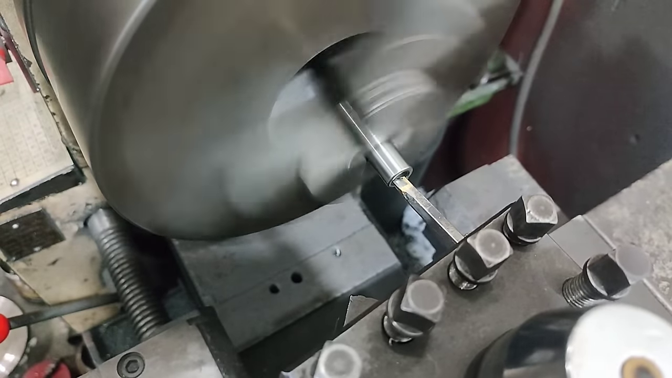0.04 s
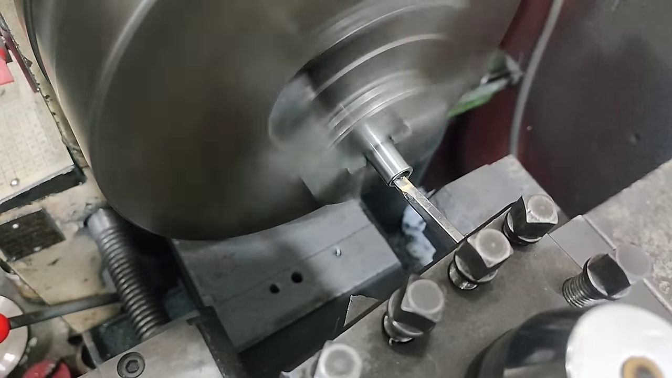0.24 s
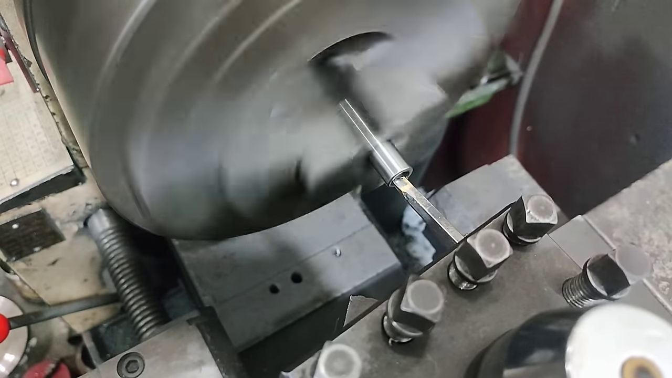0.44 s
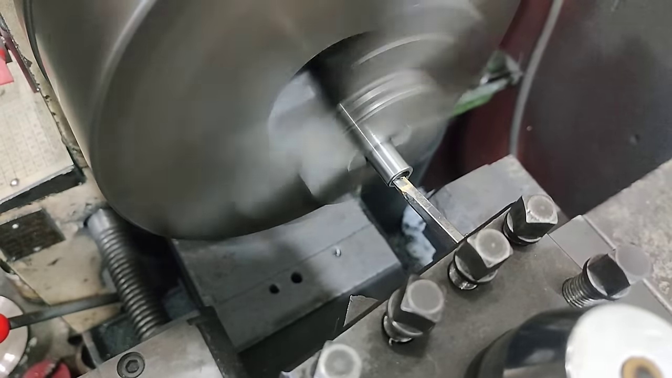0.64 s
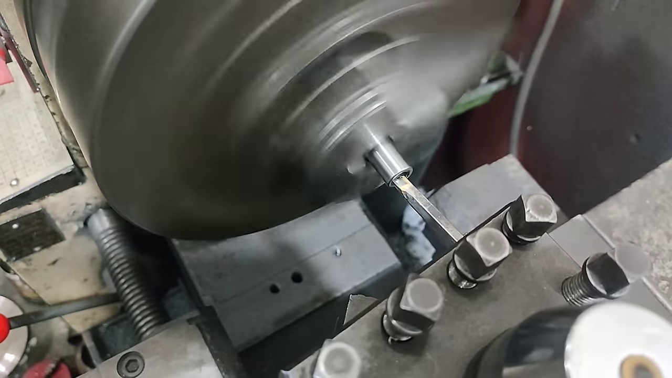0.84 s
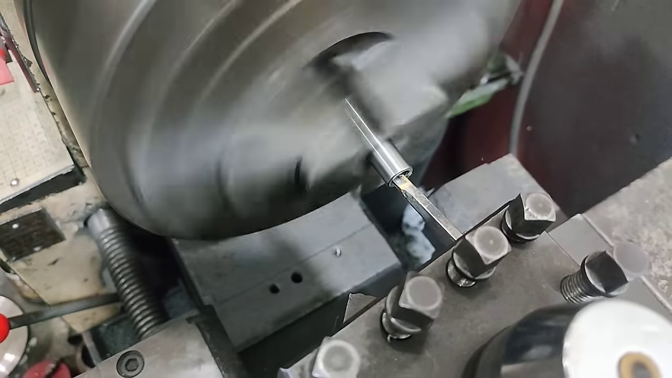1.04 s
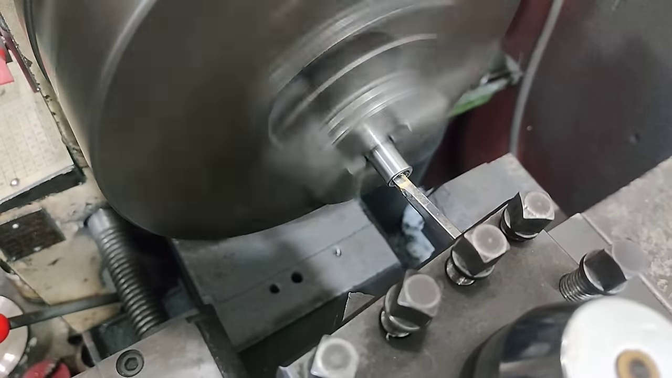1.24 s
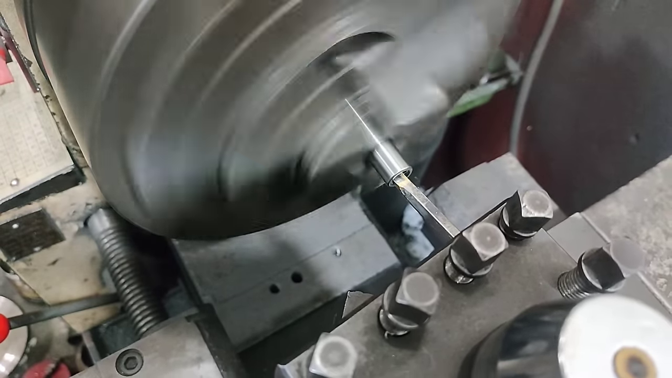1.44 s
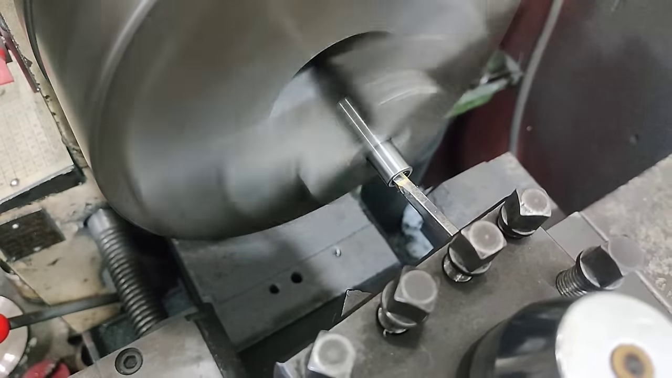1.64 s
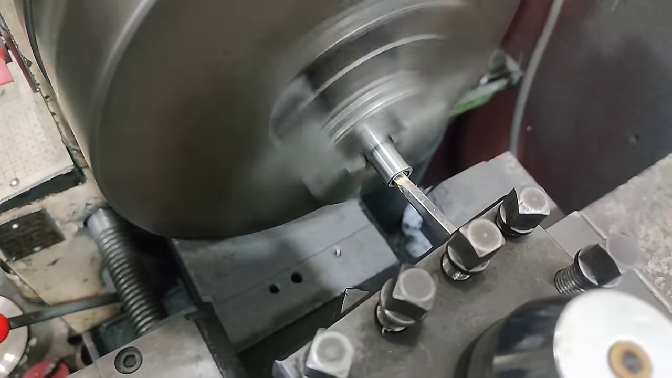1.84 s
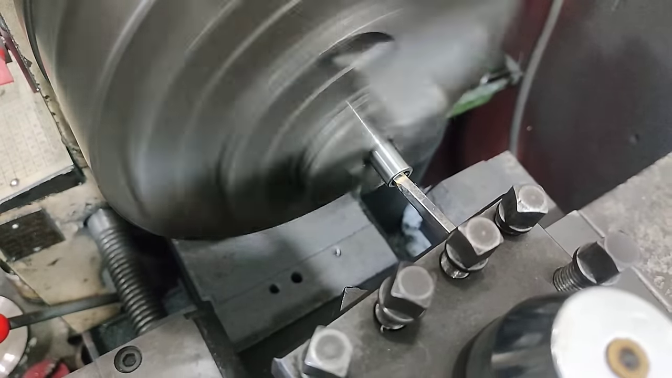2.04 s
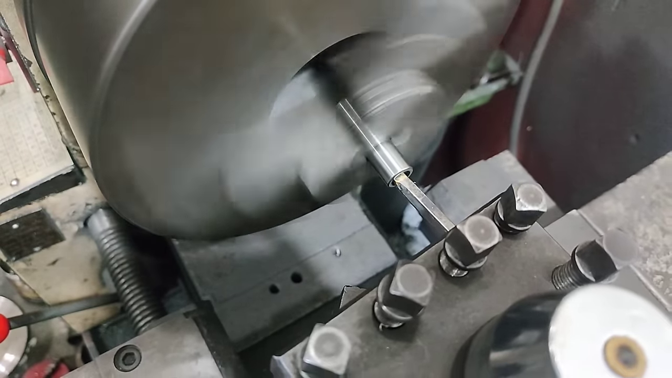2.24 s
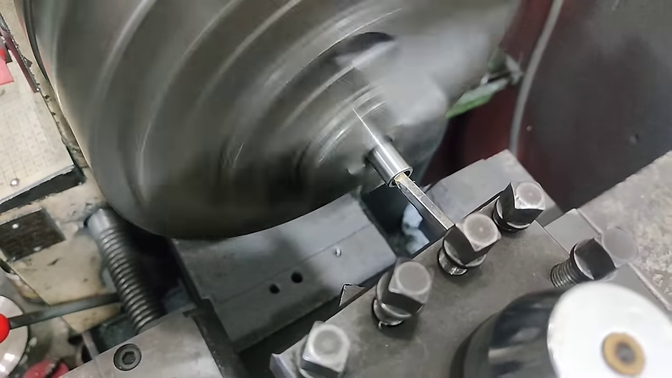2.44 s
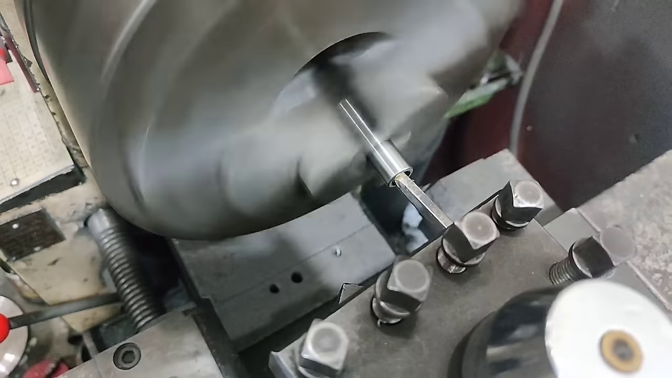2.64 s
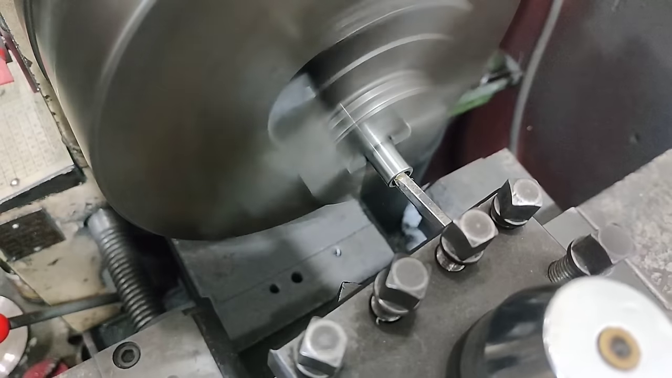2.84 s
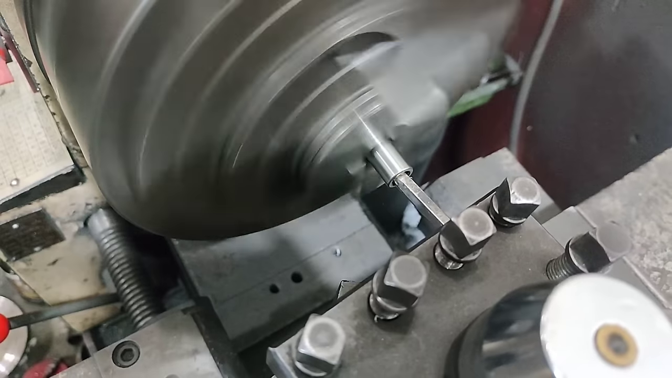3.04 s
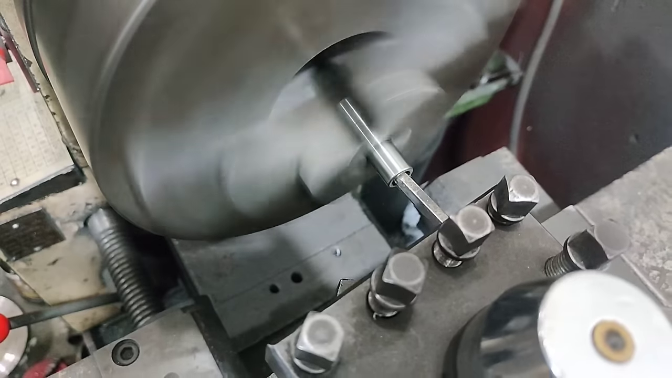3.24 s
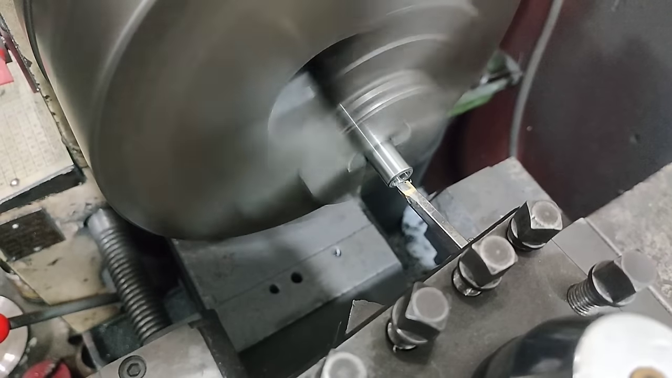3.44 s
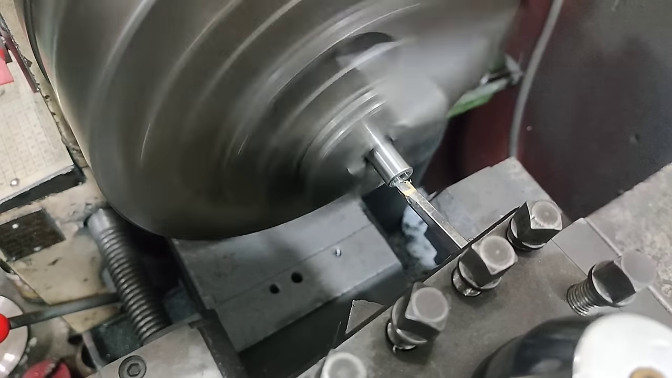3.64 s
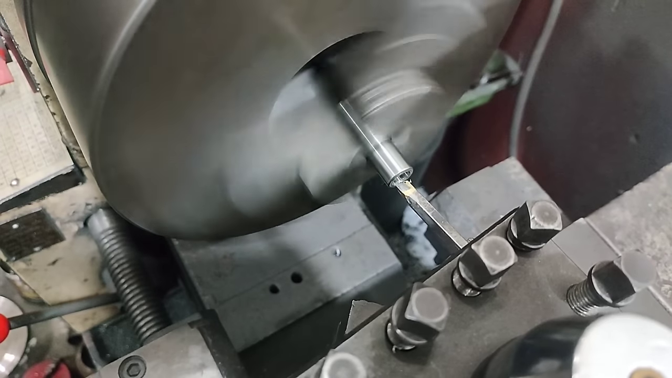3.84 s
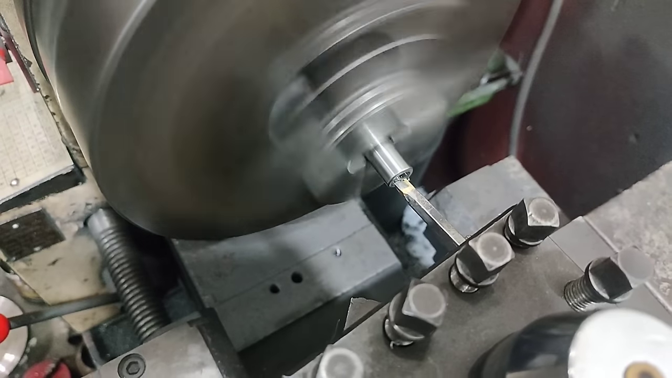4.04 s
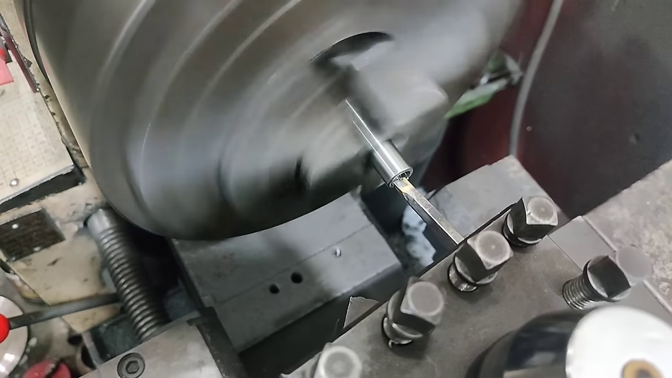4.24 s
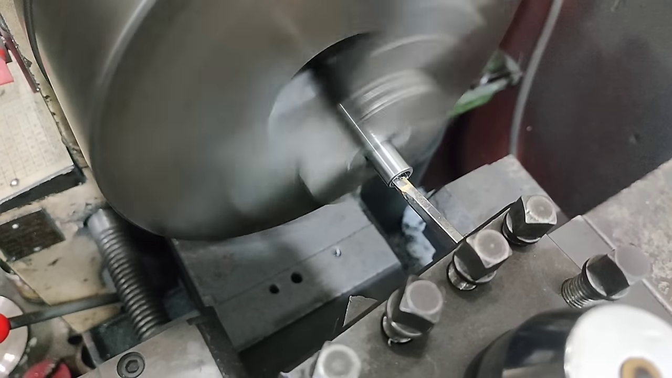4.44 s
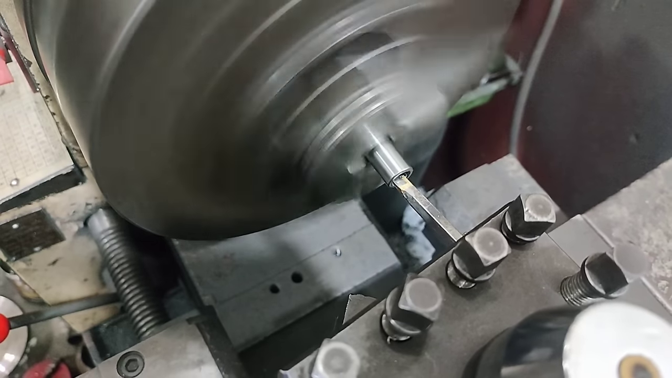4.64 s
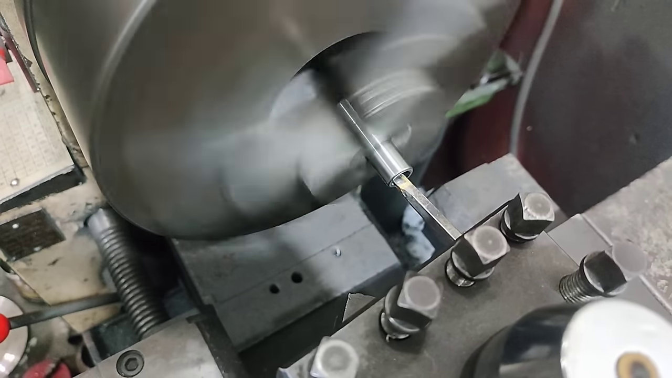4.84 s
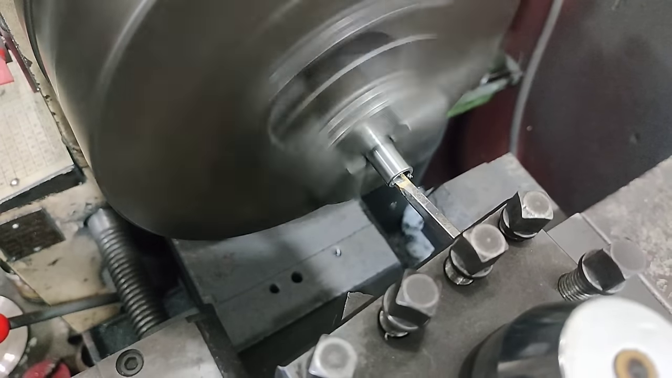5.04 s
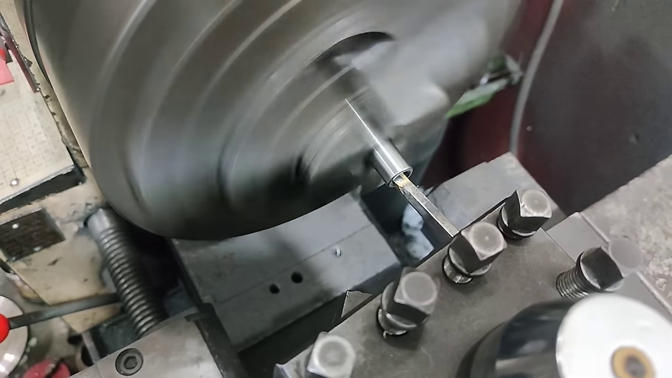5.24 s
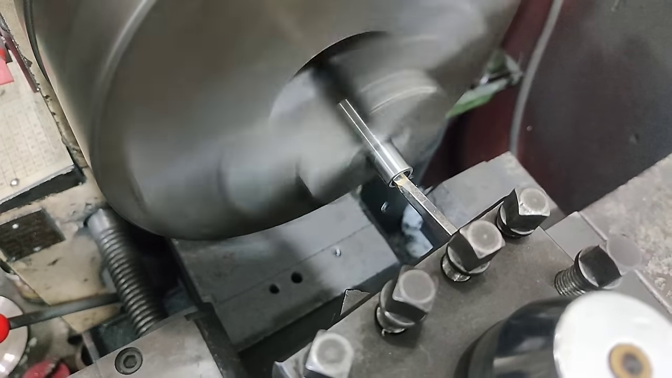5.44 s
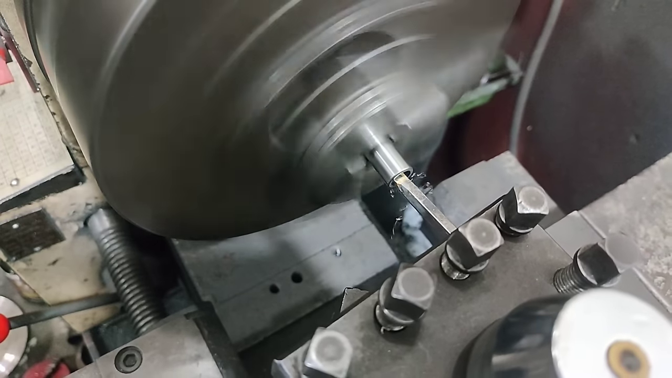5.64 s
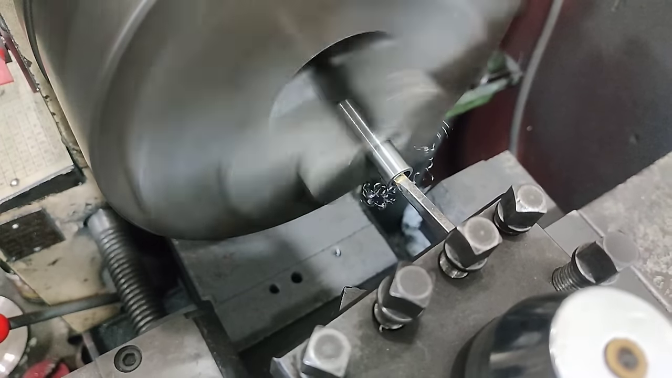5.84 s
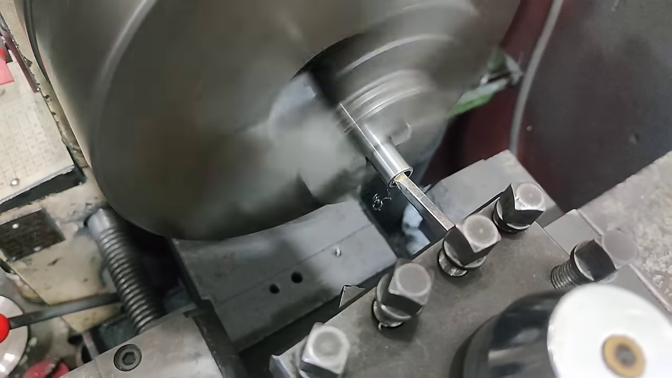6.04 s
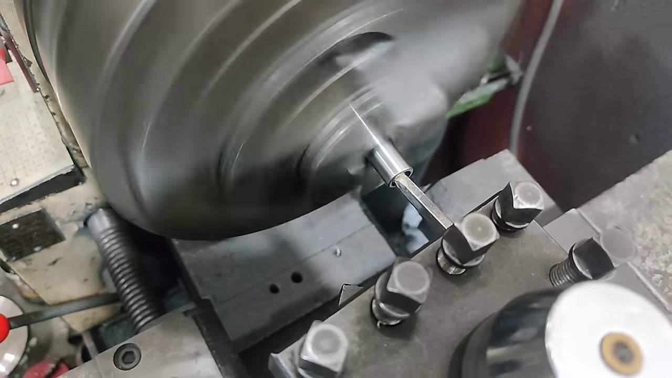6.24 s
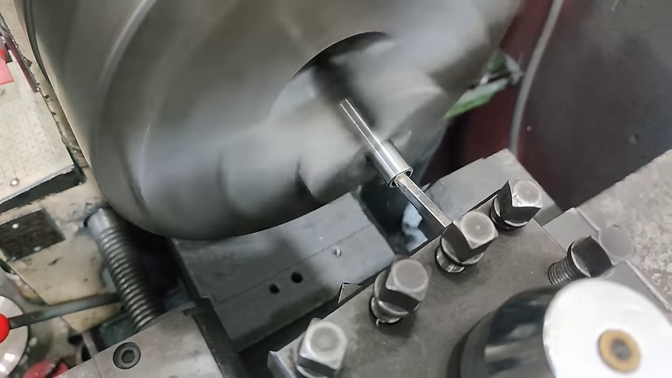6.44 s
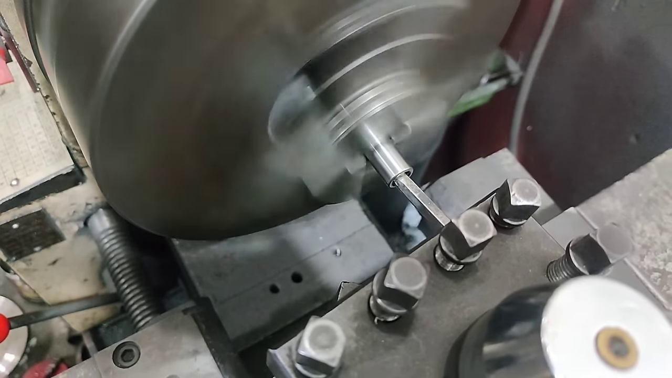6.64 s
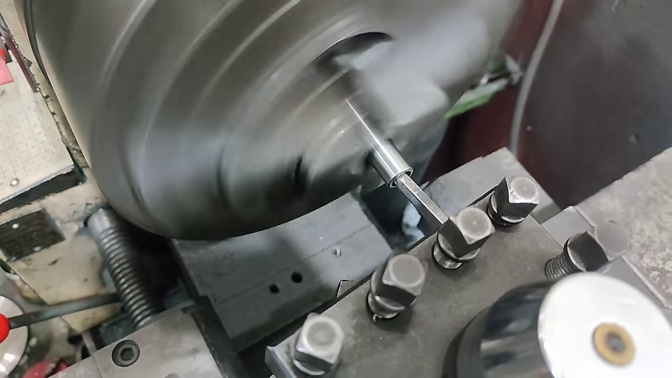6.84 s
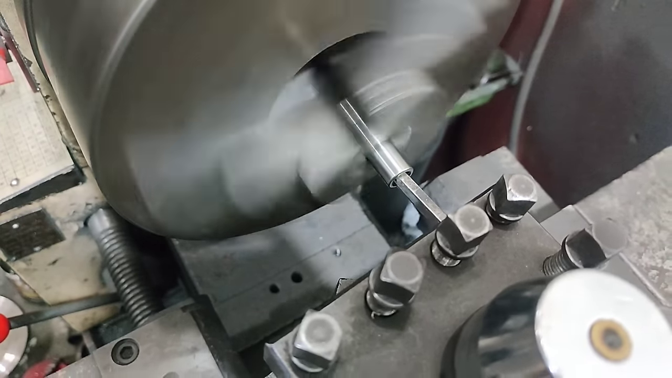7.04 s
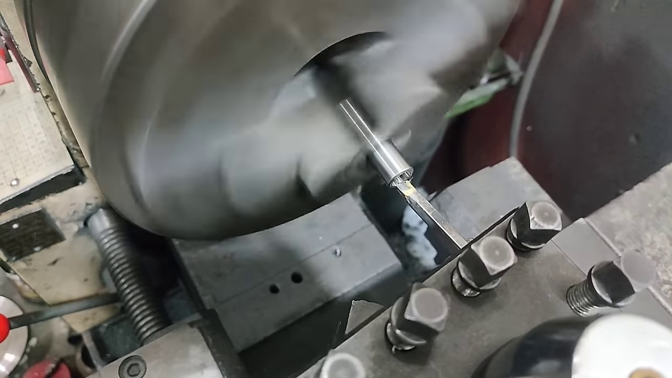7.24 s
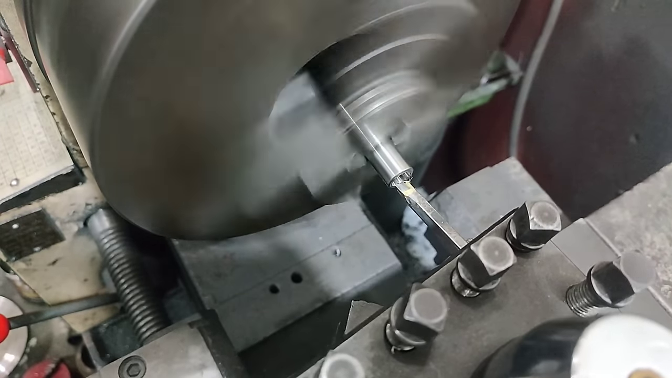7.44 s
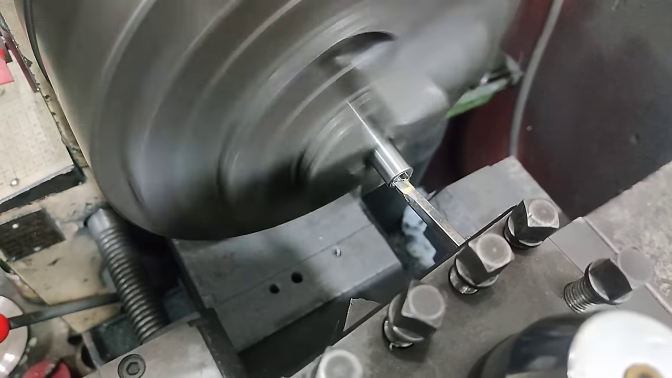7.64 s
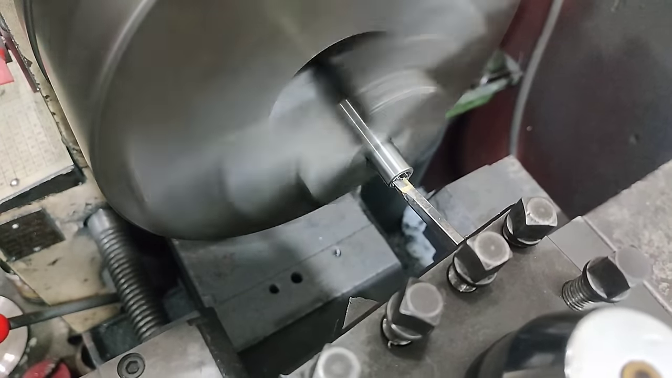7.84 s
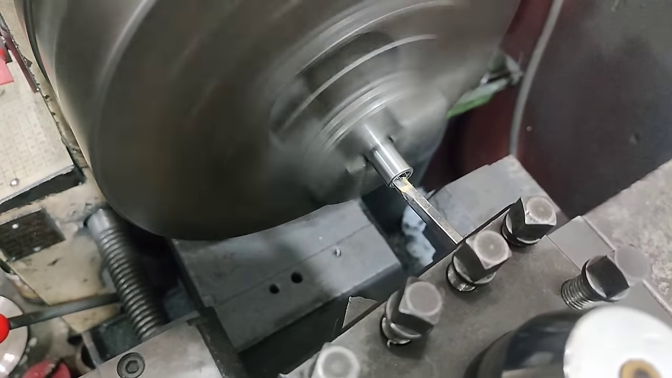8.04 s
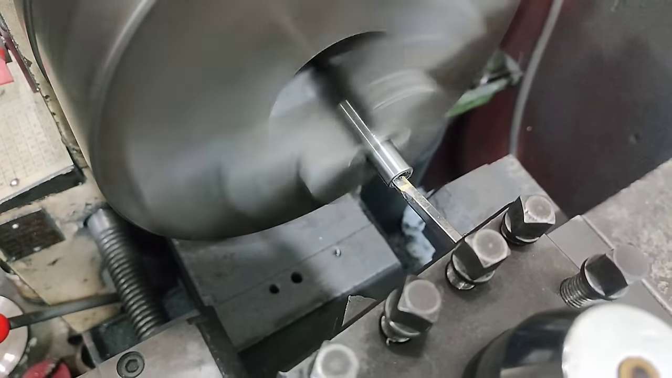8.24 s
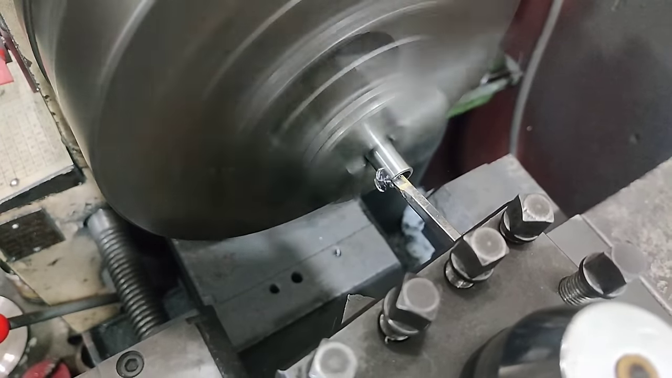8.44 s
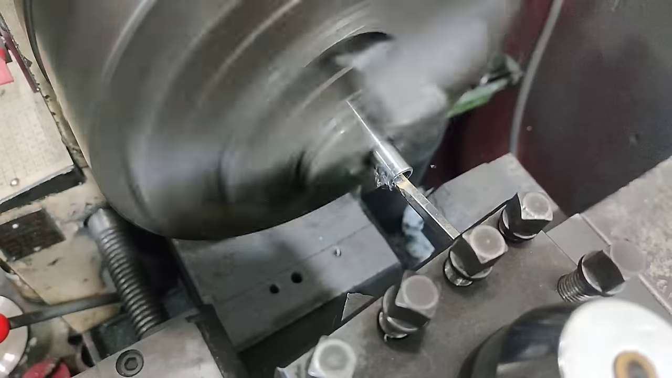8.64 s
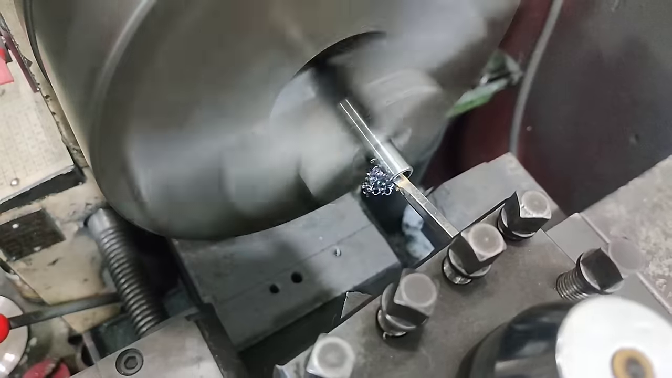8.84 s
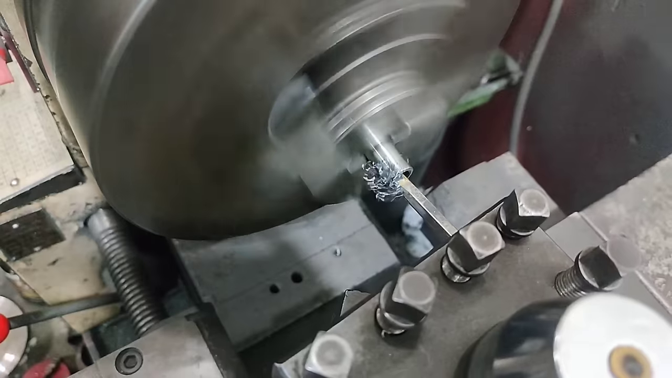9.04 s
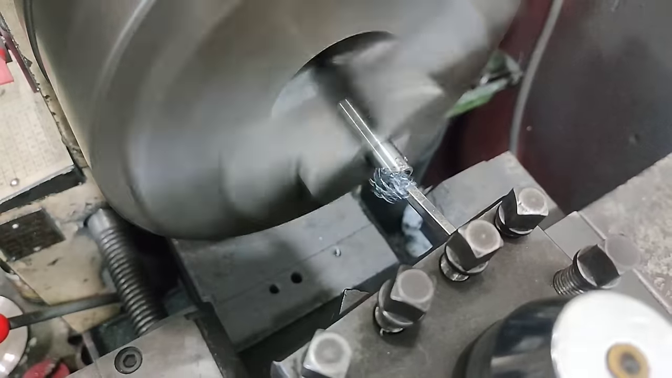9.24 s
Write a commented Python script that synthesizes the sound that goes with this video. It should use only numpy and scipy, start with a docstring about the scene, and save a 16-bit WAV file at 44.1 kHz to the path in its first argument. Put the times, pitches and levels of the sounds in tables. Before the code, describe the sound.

A lathe hums steadily in a workshop, heard closely in stereo: broad motor noise, whining gears, a steady tone near 1.1 kHz and low rumble stronger on the left. At about 0.9 s the boring tool bites with a piercing metallic squeal, dropping from 2.6 to 2.2 kHz, fluttering about 38 times a second, then climbing and turning ragged. Around 2.3 s it breaks into a wavering, flaring shriek near 14 kHz with scraping hiss; the machine sinks beneath it. A click at 3.3 s, and tool and echo vanish, leaving the hum. A second squeal starts at 4.5 s, falls, roughens near 6 s and breaks into shrieking and scraping from 6.2 s until a click and abrupt cut at 7.1 s, with a minute gap. The third begins at 8.1 s, sinking to 1.9 kHz, brighter and buzzier, over stronger rumble until the end, about 9.3 s.

```python
"""A chattering lathe

A lathe runs in a workshop: shaped noise and resonances make its motor and gears rumble and whine steadily.
Three times the boring tool bites and chatters, a harmonic series whose pitch wobbles on each turn of the work.
Twice the squeal breaks into a very high shriek, one wavering sine over a scraping hiss; a click is heard and
the sound of the tool is cut off at once, echo and all."""
import sys
import numpy as np
from scipy import signal
from scipy.fft import rfft, irfft
from scipy.io import wavfile
from scipy.ndimage import uniform_filter1d, minimum_filter1d

SR = 44100
rng = np.random.default_rng(int(sys.argv[2]) if len(sys.argv) > 2 else 0)


def attenuation_scalar(level_db):
    """Turn a level in dB into a linear amplitude multiplier (20 dB per decade)."""
    decades = np.asarray(level_db, float) / 20
    return 10 ** decades


def inscribe(sig):
    """Save sig as 16-bit PCM at rate SR to the path in sys.argv[1].

    A 1-D sig is mono; a 2-D sig holds one channel per row.
    Samples are clipped to [-1, 1] before scaling.
    """
    pcm = np.round(np.clip(np.atleast_2d(sig).T, -1, 1) * 32767)
    wavfile.write(sys.argv[1], SR, pcm.astype(np.int16))


N = 410130
SECONDS = np.arange(N) / SR
OPPOSITE = np.array([[1], [-1]])   # left up, right down

# Path of the chatter, one list per cut. Each row: time in seconds, pitch in Hz, relative level of the
# fundamental in dB.
SQUEALS = [
    [(0.86, 2590, -39), (0.885, 2490, -20), (0.954, 2242, -23), (1.242, 2167, -24), (1.51, 2215, -25.5),
     (1.68, 2304, -22), (1.95, 2420, -23), (1.998, 2560, -27), (2.068, 2394, -23.5), (2.265, 2570, -25),
     (2.285, 2804, -26.5), (2.42, 2875, -37.5)],
    [(4.507, 2640, -38), (4.544, 2480, -24), (4.75, 2294, -22), (4.9, 2198, -23), (5.6, 2155, -24),
     (5.944, 2212, -23), (6.096, 2473, -27.5), (6.2, 2510, -32), (6.215, 2900, -30), (6.3, 2880, -37.5)],
    [(8.09, 2540, -45), (8.125, 2457, -23.5), (8.2, 2318, -20), (8.25, 2257, -23), (8.456, 2132, -23),
     (8.952, 1902, -24), (9.3, 1900, -25.5)],
]
# Timbre against pitch: the upper harmonics strengthen as the chatter falls. Each row: pitch in Hz, octave in dB
# and upper harmonics in dB, both relative to the fundamental, swing per turn in Hz.
CHATTER = [(1900, -0.5, 1.5, 39.5), (2050, 0, -0.5, 85), (2205, 2, -2, 77.6), (2333, 2.5, -8, 60),
           (2434, 3, -8.5, 54.3), (2607, -7.5, -11.5, 50), (2900, -6, -12, 50.4)]
# Slope of the harmonic series. Each entry: relative level in dB, from the third harmonic to the seventh.
UPPER_DB = [-2.5, -4.5, -8.5, -9.5, -12]
# How well tool and work radiate the upper harmonics. Each row: frequency in Hz, gain in dB.
RADIATION = [(5500, 0.5), (7000, -2), (8800, 1), (9600, 0), (10300, -7), (11300, 2), (12500, 4),
             (14000, -7)]
# Balance of the harmonics. Each row: frequency in Hz, left minus right in dB.
SQUEAL_SIDE = [(1500, 14), (2200, -1), (4400, -6), (6500, -3.5), (8800, 7.5), (13000, -3)]
CATCH_S, BEFORE_CATCH_DB = 0.034, -15   # the overtones catch suddenly, a little after the fundamental
JITTER_HZ, RAGGED_JITTER_HZ = 18, 260
SCRATCH_FLICKER_DB = 3


def squeal(turn, ragged):
    """Stick-slip oscillation: phase-locked harmonics swing as the depth of cut changes round each turn."""
    on, (hz, low_db) = in_time(SQUEALS)
    catching = sum(span(rows[0][0] - CATCH_S, 2 * CATCH_S, .004) for rows in SQUEALS)
    over_db = low_db + BEFORE_CATCH_DB * catching
    octave_db = over_db + at_hz(CHATTER, hz)
    upper_db = over_db + at_hz(CHATTER, hz, axis=2)

    wobble = np.sin(turn) + .3 * np.cos(2 * turn) + .12 * drift(8)
    swing = at_hz(CHATTER, hz, axis=3) * wobble
    jitter = (JITTER_HZ + RAGGED_JITTER_HZ * ragged) * drift(80)
    phase = 2 * np.pi * np.cumsum(hz + swing + jitter) / SR

    levels_db = [low_db, octave_db]
    for k, db in enumerate(UPPER_DB, 3):
        levels_db.append(upper_db + db + at_hz(RADIATION, k * hz))
    harmonics = 0
    for k, db in enumerate(levels_db, 1):
        pan_db = at_hz(SQUEAL_SIDE, k * hz) / 2 * OPPOSITE
        throb_db = 1.5 * min(k, 3) * np.sin(turn + 1.0 * k) + 1.7 * drift(37)
        rasp = 1 + (0.07 + 0.04 * k) * drift(300)   # noisy skirts, stronger on the higher harmonics
        level = attenuation_scalar(db + 6.0 + pan_db + throb_db - 2.7 * ragged)
        harmonics = harmonics + level * rasp * np.sin(k * phase)

    chips = attenuation_scalar(upper_db - 6.5) * stereo_noise(resonance(12700, 2200))   # bright hiss of the chip on the tool
    chips += attenuation_scalar(upper_db - 11) * stereo_noise(resonance(13500, 500))   # it also stirs the tool's high mode
    scratch = stereo_noise(resonance(3100, 1600)) + 1.8 * stereo_noise(resonance(6700, 9000))
    scratch_level = ragged * attenuation_scalar(low_db - 1.5 + SCRATCH_FLICKER_DB * drift(40))
    return on * (harmonics + chips + scratch_level * scratch)


# Path of the high mode, one list per shriek. Each row: time in seconds, pitch in Hz, relative tone level in dB.
SHRIEKS = [
    [(2.25, 13900, -45), (2.3, 14030, -26), (2.444, 14160, -27), (2.528, 14080, -23), (2.656, 14080, -29),
     (2.82, 14100, -19), (2.9, 13700, -13), (2.952, 13790, -9), (3.06, 13690, -10.5), (3.198, 13700, -13.5),
     (3.335, 13900, -15.5)],
    [(6.17, 13960, -29), (6.246, 14060, -13), (6.364, 14100, -9.5), (6.41, 14000, -11),
     (6.462, 13980, -13.5), (6.7, 14080, -19.5), (6.906, 13540, -15.5), (6.99, 14140, -19),
     (7.092, 13770, -17), (7.112, 13900, -28)],
]
# The shriek is noisier and less steady when it sags in pitch. Each row: pitch in Hz, noise skirt in dB relative
# to the tone, waver in Hz.
SKIRT = [(13700, -17.5, 75), (13900, -15, 70), (14080, -31, 43)]
# The shriek flares up. Each row: time in seconds, relative peak in dB.
FLARES = [(2.3752, -7), (2.3996, -11), (2.4345, -8), (2.4819, -12.5), (2.5069, -12), (2.5368, -13),
          (2.5597, -16), (2.7877, -11), (2.8506, -6), (2.8815, -7), (2.92, -7), (3.0032, -2), (3.0697, -6),
          (3.1095, -7), (3.322, -7), (6.2214, -10), (6.8704, -1.5), (6.967, -3)]
# Spells of hard scraping. Each row: start in seconds, length in seconds, relative starting level in dB.
SCRAPES = [(2.478, 0.011, -39), (2.529, 0.28, -39), (6.415, .4, -38), (6.995, 0.14, -36.5)]
# Spectrum of the scraping hiss. Each row: frequency in Hz, relative density in dB per Hz.
SCRAPE = [(1470, -51), (2500, -14.5), (4660, -36), (5500, -11), (6060, -14), (7830, -2), (9230, -25.5),
          (12000, -9), (15600, -36), (22000, -120)]
# Lower mode of the tool: centre in Hz, width in Hz.
LOWER_RING = (12480, 290)
SCRAPE_FADE_DB_PER_S = -17.5
LIGHT_SCRAPE_DB, RING_DB, FLARE_LIFT_DB = -49, 10, 4.0   # all relative


def shriek(turn, ragged):
    """Modal vibration: a high mode of the tool sings, wavers and flares; a lower one rings under scraping."""
    on, (hz, tone_db) = in_time(SHRIEKS)
    waver = at_hz(SKIRT, hz, axis=2) * (.85 * np.sin(turn) + drift(70))
    phase = 2 * np.pi * np.cumsum(hz + waver) / SR
    kicks = np.zeros(N)
    for s, db in FLARES:
        kicks[round((s - .003) * SR)] = attenuation_scalar(db + FLARE_LIFT_DB)
    flares = signal.fftconvolve(kicks, np.hanning(int(0.013 * SR)))[:N]
    tone_level = np.maximum(attenuation_scalar(tone_db + 3.0 + 1.7 * drift(30)), flares)
    tone = tone_level * np.sin(phase)

    throb = attenuation_scalar(3.8 * np.sin(turn) + 3.9 * drift(49)) * (1 - ragged)
    hard = 0
    for s, length_s, db in SCRAPES:
        hard = hard + span(s, length_s, 0.0058) * attenuation_scalar(db + SCRAPE_FADE_DB_PER_S * (SECONDS - s))
    skirt_noise = stereo_noise(lambda f: resonance(13200, 2200)(f) ** 2)
    skirt = attenuation_scalar(tone_db + at_hz(SKIRT, hz)) * skirt_noise
    ring = hard * attenuation_scalar(RING_DB) * stereo_noise(resonance(*LOWER_RING))
    hiss = stereo_noise(lambda f: attenuation_scalar(at_hz(SCRAPE, f)))
    scrape = (hard + attenuation_scalar(LIGHT_SCRAPE_DB)) * attenuation_scalar(4.5) * hiss
    return on * (tone + throb * (skirt + ring + scrape))


# Short clicks. Each row: start in seconds, level in dB.
CLICKS = [(3.326, -26.5), (7.098, -26)]


def clicks():
    """Short noise bursts: a click of bright broadband noise is heard just before the tool sound is cut off."""
    bursts = sum(attenuation_scalar(db) * span(s, 0.0029, .001) for s, db in CLICKS)
    return bursts * stereo_noise(resonance(10700, 12000))


# The tool loses its grip. Each row: start in seconds, worst moment in seconds, end in seconds, raggedness 0 to 1.
BREAKUPS = [(2.231, 2.35, 2.45, .55), (6.019, 6.205, 6.3, .85)]


def loss_of_grip():
    """Breakdown of the stick-slip cycle: raggedness rises straight to its worst and falls straight back."""
    ragged = sum(np.interp(SECONDS, row[:3], [0, row[3], 0]) for row in BREAKUPS)
    return np.clip(ragged, 0, 1)


def rotation():
    """Periodic forcing: the angle of the work in radians, at a slightly drifting 38 turns per second."""
    return 2 * np.pi * np.cumsum(38 + 1.8 * drift(1.5)) / SR


# Spectrum of motor and bearing noise. Each row: frequency in Hz, relative density in dB per Hz.
DRIVE = [(41, -49), (70, -14), (389, -11), (444, -8.5), (580, -12.5), (678, -4.5), (775, -7), (1080, -5),
         (1210, -12), (1380, -11.5), (2880, -17), (7010, -26.5), (14300, -50.5)]
# Gear resonances. Each row: centre in Hz, width in Hz, level in dB relative to the drive noise.
GEARS = [(449, 23, -15.5), (688.6, 26, -7.5), (1100, 72, -7), (1355, 55, -11.5), (2022, 180, -11.5),
         (12800, 2600, -33)]
# Steady motor tone: frequency in Hz, level in dB relative to the drive noise.
MOTOR_WHINE = (1100, -2.74)
# The rumble grows for good: middle of the rise in seconds, length of the rise in seconds, gain in dB.
RUMBLE_SWELL = (8.2, .3, 4.2)
DRIVE_DB, DRIVE_LEFT_DB = -27.5, 0.87   # level; left minus right
RUMBLE_DB, RUMBLE_WAVER_DB = -47, 2.5


def machine(sink_db):
    """Broadband and resonant radiation: motor noise, gear whines, a motor tone, a rumble stronger on the left."""
    drive = stereo_noise(lambda hz: attenuation_scalar(at_hz(DRIVE, hz))) * attenuation_scalar(0.93 * drift(14.0))
    for hz, width_hz, db in GEARS:
        drive += attenuation_scalar(db) * stereo_noise(resonance(hz, width_hz))
    hz, db = MOTOR_WHINE
    phase = 2 * np.pi * np.cumsum(hz + 2.91 * drift(12.35)) / SR
    whine_level = attenuation_scalar(db + 1.5 * np.array([drift(35), drift(18)]))
    drive += whine_level * np.sin(phase + [[1.3], [0]])   # left leads

    s, rise_s, swell_db = RUMBLE_SWELL
    rumble_db = RUMBLE_DB + RUMBLE_WAVER_DB * drift(3.7)
    rumble_db = rumble_db + swell_db * span(s, N / SR, rise_s) + 0.35 * sink_db
    rumble = stereo_noise(resonance(48.6, 53)) * attenuation_scalar(np.array([[5.0], [-1.5]]))
    return attenuation_scalar(DRIVE_DB + sink_db + DRIVE_LEFT_DB / 2 * OPPOSITE) * drive + attenuation_scalar(rumble_db) * rumble


# The machine sinks while the tool shrieks, and slightly once near the end; overlapping rows add.
# Each row: start in seconds, length in seconds, change in dB.
SINKS = [(2.357, .975, -3.5), (2.452, 0.37, -5.5), (6.05, 1.086, -5.5), (6.043, 0.21, -3),
         (6.42, 0.395, -4), (6.98, 0.12, -4), (9.0, 0.39, -1.5)]


def sinking():
    """Level modulation: the sagging of the machine, in dB."""
    return sum(db * span(s, length_s, .02) for s, length_s, db in SINKS)


def shop(x, t60_s, wet_db):
    """Reverberation: direct sound plus a dense exponentially dying tail of its own in each channel."""
    t = np.arange(int(t60_s * SR)) / SR
    tail = rng.standard_normal((2, len(t))) * attenuation_scalar(-60 * t / t60_s) * (t > .001)
    tail *= attenuation_scalar(wet_db) / np.sqrt(np.sum(tail ** 2, axis=1, keepdims=True))
    tail[0, 0] = tail[1, 12] = 1   # direct sound, 12 samples later on the right: the tool is nearer the left
    return signal.fftconvolve(x, tail, axes=1)[:, :N] / np.hypot(1, attenuation_scalar(wet_db))


# Coherence between the channels. Each row: frequency in Hz, left-right likeness, lead of the left in radians.
LIKENESS = [(60, 0.29, 0.1), (130, 0.8, 0.1), (298, 1, 0.33), (440, 0.71, 0.47), (677, 0.73, 1.91),
            (1500, 0.073, 1.91), (4000, 0.082, 2.55)]


def stereo_noise(gain_at):
    """Partial coherence: noise of rms 1 with amplitude gain_at(Hz), shared and opposed parts mixed by likeness."""
    hz = np.arange(N // 2 + 1) * SR / N + 1
    mid, side = rfft(rng.standard_normal((2, N))) * gain_at(hz)
    alike = np.clip(at_hz(LIKENESS, hz), -1, 1)
    pair = np.sqrt(1 + alike) * mid + np.sqrt(1 - alike) * side * OPPOSITE
    pair[0] *= np.exp(1j * at_hz(LIKENESS, hz, axis=2))
    return rms_one(irfft(pair, N))


def resonance(centre_hz, width_hz):
    """Resonance curve: amplitude 1 on top, one half at the edges of the width."""
    return lambda hz: 1 / (1 + (2 * (hz - centre_hz) / width_hz) ** 2)


def drift(rate_hz):
    """Low-passed noise of rms 1: sparse noise, every 40 samples, through a double one-pole filter."""
    r = np.exp(-80 * np.pi * rate_hz / SR)
    sparse = rng.standard_normal(N // 40 + 2002)
    slow = signal.lfilter([1], [1, -2 * r, r * r], sparse)[2000:]   # past the filter's build-up
    return np.interp(np.arange(N) / 40, np.arange(len(slow)), rms_one(slow))


def rms_one(x):
    """Normalisation by mean power: scale to rms 1."""
    return x / np.sqrt(np.mean(x ** 2) + 1e-20)


def span(start_s, length_s, edge_s):
    """Gating: 1 during a span, 0 outside, with straight edges."""
    inside_s = np.minimum(SECONDS - start_s, start_s + length_s - SECONDS)
    return np.clip(inside_s / max(edge_s, 1e-4) + .5, 0, 1)


def in_time(tables):
    """Linear interpolation in time: a softened mask of where any table runs, and the columns at every sample."""
    s, *columns = np.transpose(np.concatenate(tables))
    on = sum((SECONDS >= rows[0][0]) & (SECONDS <= rows[-1][0]) for rows in tables)
    return uniform_filter1d(on * 1.0, size=200), [np.interp(SECONDS, s, c) for c in columns]


def at_hz(points, hz, axis=1):
    """Interpolation on a log-frequency axis: read one column of a spectrum table."""
    points = np.array(points)
    return np.interp(np.log(hz), np.log(points[:, 0]), points[:, axis])


# The tool sound is cut off. Each row: time in seconds, length in seconds of near silence that follows.
CUTOFFS = [(3.335, 0), (7.112, .007)]


def scene():
    """Superposition: tool in the shop, the shriek with a shorter echo; tool sound and echo are cut off together."""
    turn, ragged = rotation(), loss_of_grip()
    tool = shop(squeal(turn, ragged), t60_s=.08, wet_db=3.5)
    tool += shop(shriek(turn, ragged), t60_s=.064, wet_db=-.5)
    running = machine(sinking())
    for s, hush_s in CUTOFFS:
        tool *= (SECONDS < s) | (SECONDS > s + .6)
        running *= np.where((SECONDS > s) & (SECONDS < s + hush_s), .03, 1)
    return tool + running + clicks()


def band_limit(x):
    """A steep low-pass at the top of the band."""
    return signal.sosfilt(signal.butter(12, 15670, fs=SR, output="sos"), x)


def record(dry):
    """Band limiting and peak limiting: the top is cut steeply and the peaks are held down by a smoothed gain."""
    low_pass = signal.ellip(12, .5, 65, 14330, fs=SR, output="sos")   # ripple dB, rejection dB, edge Hz
    cut = signal.sosfilt(low_pass, dry)
    ceiling = .88
    room_left = np.minimum(1, ceiling / (np.abs(cut).max(axis=0) + 1e-9))
    gain = uniform_filter1d(minimum_filter1d(room_left, size=401), size=201)
    return band_limit(cut * gain)


dry = scene()
out = record(dry)
inscribe(out)
```